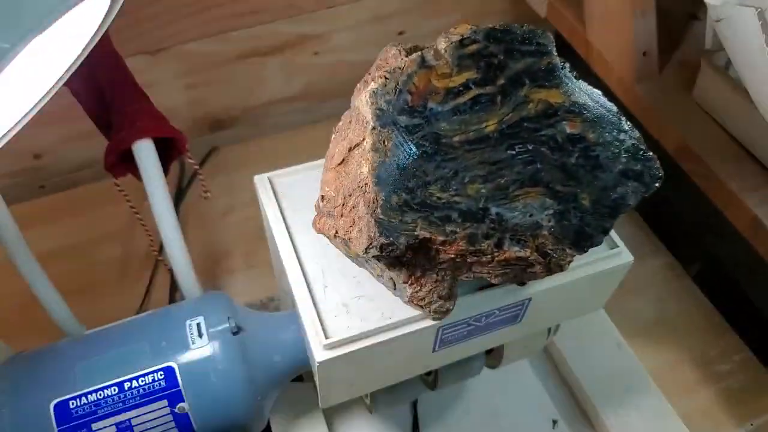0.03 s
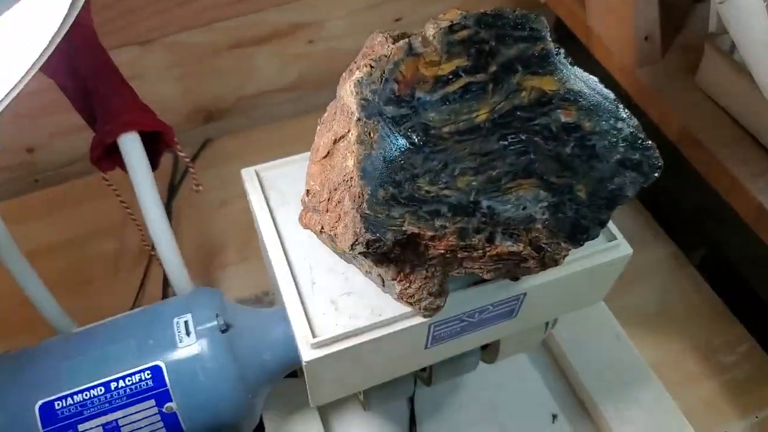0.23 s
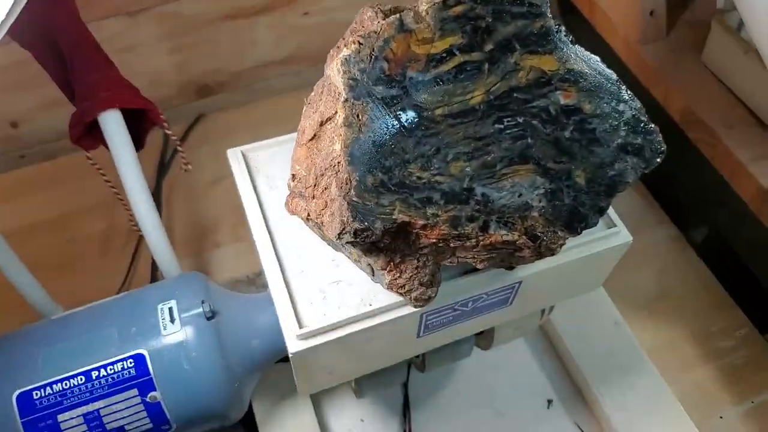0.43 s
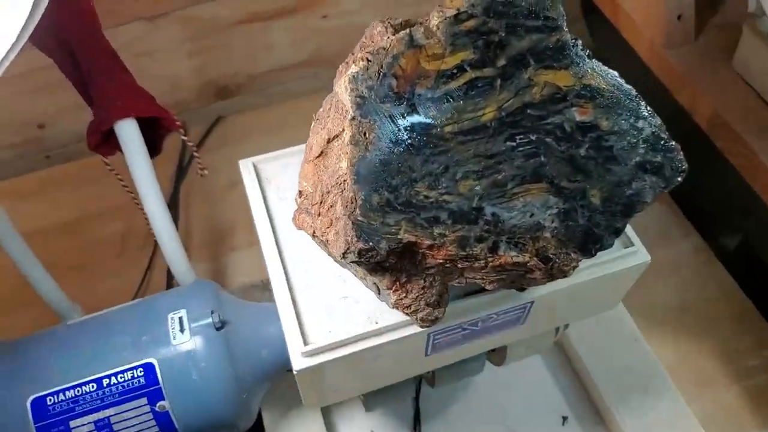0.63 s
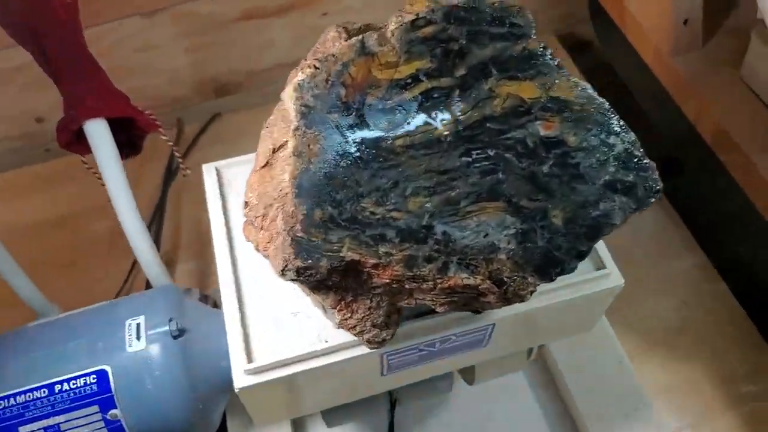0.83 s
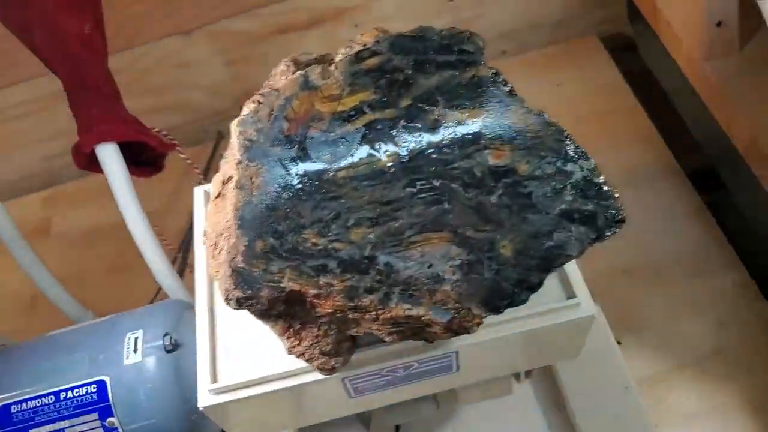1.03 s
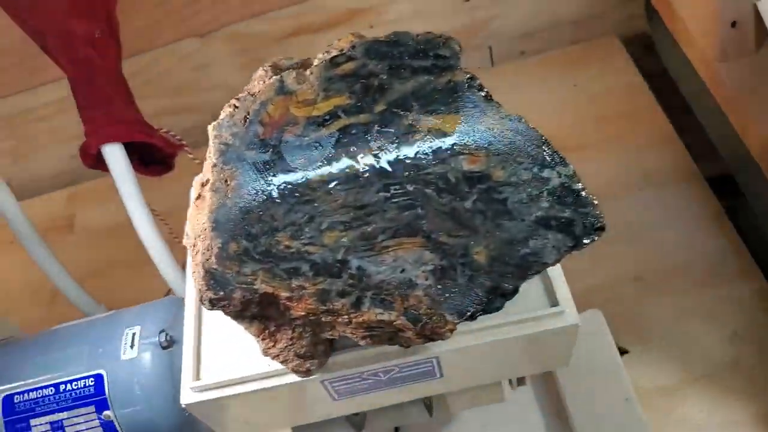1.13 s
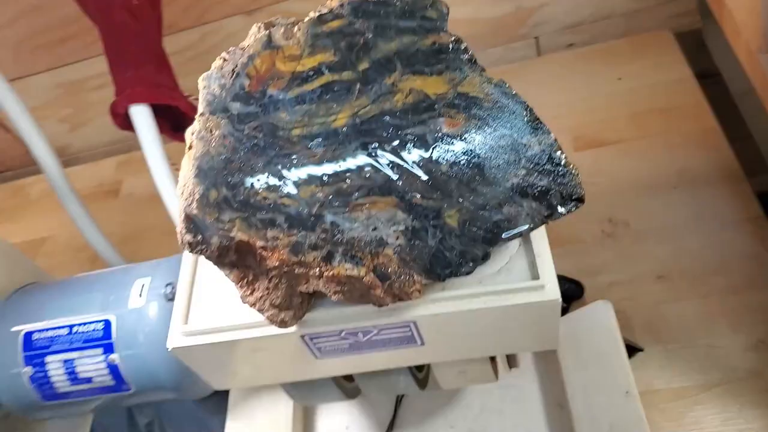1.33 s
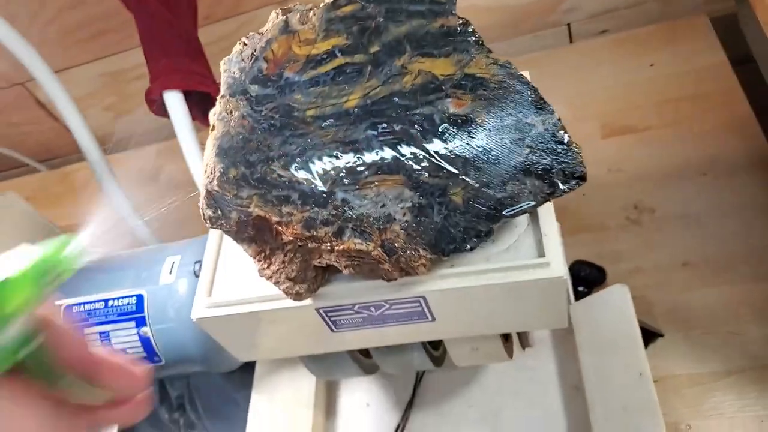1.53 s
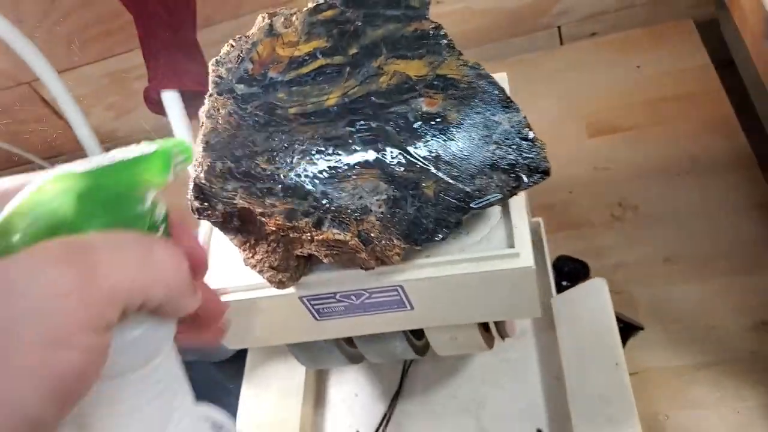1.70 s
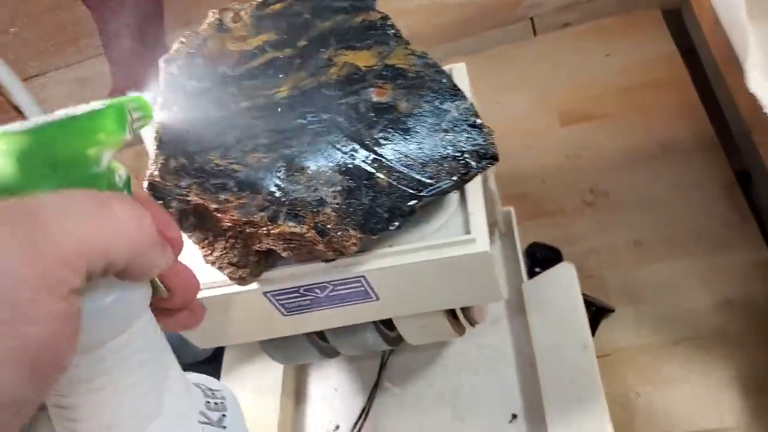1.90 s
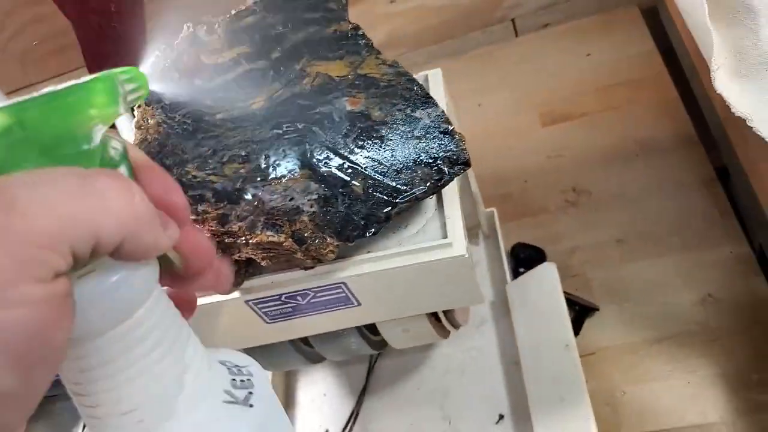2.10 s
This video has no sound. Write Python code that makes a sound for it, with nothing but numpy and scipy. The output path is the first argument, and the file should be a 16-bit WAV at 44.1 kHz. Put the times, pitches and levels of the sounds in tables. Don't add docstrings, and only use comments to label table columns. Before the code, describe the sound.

A hand-held spray bottle gives three brief hissing squirts with droplets pattering on stone, after quiet sleeve rubs, plastic ticks and soft bench thuds; small wooden workshop, close phone microphone, faint mains hum.

```python
import sys
import numpy as np
from scipy import signal
from scipy.fft import rfft, irfft
from scipy.io import wavfile
from scipy.ndimage import uniform_filter1d

SR = 44100
rng = np.random.default_rng(int(sys.argv[2]) if len(sys.argv) > 2 else 0)


def wav_out(sig):
    wavfile.write(sys.argv[1], SR, np.round(np.clip(np.atleast_2d(sig).T, -1, 1) * 32767).astype(np.int16))


def level_to_linear(level):
    exponent = np.asarray(level, float) / 20
    return 10 ** exponent


N = 94991
T = np.arange(N) / SR


def unit(x):
    return x / np.sqrt(np.mean(x ** 2))


def noise():
    return rng.standard_normal((3, N))


def colour(x, spectrum):
    hz, db = np.array(spectrum).T
    bin_hz = np.arange(N // 2 + 1) * SR / N + 1
    bin_db = np.interp(np.log(bin_hz), np.log(hz), db, left=-np.inf)
    return unit(irfft(rfft(x) * level_to_linear(bin_db), N))


def walk(rate_hz):
    k = int(SR / rate_hz)
    steps = np.repeat(rng.standard_normal(N // k + 1), k)
    return uniform_filter1d(uniform_filter1d(steps, k), k)[:N]


def since(start_s):
    return np.clip(T - start_s, 0, None)


def swell(start_s, rise_s, hold_s, fade_s):
    t = T - start_s
    return np.clip(t / rise_s, 0, 1) * np.exp(-np.clip(t - rise_s - hold_s, 0, None) / fade_s)


def rub(rubs, spectrum, rough_db):
    force = sum(level_to_linear(db) * swell(start, rise, hold, fade) for start, rise, hold, fade, db in rubs)
    return force * level_to_linear(rough_db * walk(45.76)) * colour(noise(), spectrum)


# (start [s], swell [s], hold [s], fade [s], level [dB])
CLOTH_RUBS = [
    (-.05, 0.14, 0.11, 0.029, -56),
    (.2, 0.027, 0.021, 0.014, -69),
]
# (frequency [Hz], level [dB])
CLOTH = [(120, -42), (200, 0.5), (1180, -1.5), (1530, -15.5), (2210, -4), (2910, -8), (3690, -4.5),
         (7410, -15), (16000, -10.5)]
# (start [s], swell [s], hold [s], fade [s], level [dB])
SLEEVE_RUBS = [
    (1.388, 0.0077, 0.27, 0.037, -53.5),
    (.97, 0.047, 0.39, 0.1, -69.5),
    (0.468, 0.018, 0.16, 0.078, -68),
]
# (frequency [Hz], level [dB])
SLEEVE = [(120, -24), (200, -11), (432, 2.5), (986, -4), (2050, -5), (3560, -5.5), (7830, -13),
          (14300, -6.5), (16000, -7)]


def sleeve_rubs():
    return rub(SLEEVE_RUBS, SLEEVE, rough_db=0.88) + rub(CLOTH_RUBS, CLOTH, rough_db=2.3)


# (frequency [Hz], width [Hz], level [dB])
HUM = [
    (57.1, 10.64, -61),
    (120.2, 11.7, -69.5),
    (567, 2.3, -77.5),
]
# (frequency [Hz], level [dB])
RUMBLE = [(25, -25), (38, -9), (52, 11.5), (75, 6.5), (130, -5), (300, -13.5), (700, -31)]
# (frequency [Hz], level [dB])
AIR = [(60, 0), (240, -29), (680, -20), (960, -25), (2500, -28), (3500, -38), (10000, -50), (16000, -51)]


def workshop():
    rumble_db, grows_db_per_s, air_db = -69.5, 7.5, -72
    hum = 0
    for hz, width_hz, db in HUM:
        level = level_to_linear(db + 2 * walk(width_hz))
        hum = hum + level * np.sin(2 * np.pi * hz * T + .5 * walk(width_hz))
    rumble = colour(noise(), RUMBLE) * level_to_linear(rumble_db + grows_db_per_s * T + 2 * walk(12.45))
    air = colour(noise(), AIR) * level_to_linear(air_db)
    return hum + rumble[0] + 0.56 * rumble[1:] + air[0] + .5 * air[1:]


# (start [s], hold [s], from [Hz], to [Hz], level [dB])
HOLLOWS = [(0.0, 0.038, 3020, 2950, -62), (0.0, 0.043, 1640, 1590, -65.5), (0.016, .04, 2200, 2200, -70),
           (0.059, 0.093, 2210, 2150, -62), (0.159, 0.036, 2300, 2260, -65),
           (0.212, 0.036, 2150, 2100, -68.5), (0.142, 0.0085, 1260, 1276, -54),
           (0.19, 0.075, 1253, 1250, -66), (0.346, 0.11, 2500, 2880, -73.5),
           (0.547, 0.014, 1740, 1680, -54), (.548, 0.011, 4200, 3980, -56), (0.589, 0.036, 1915, 1840, -68),
           (0.787, 0.0096, 6300, 6010, -53.5), (0.807, 0.061, 1500, 1500, -58),
           (1.257, 0.022, 2790, 2640, -55), (1.258, 0.026, 3700, 3580, -53.5),
           (1.298, 0.11, 2394, 2882, -57.5), (1.312, 0.146, 2197, 2158, -61),
           (1.784, 0.048, 1315, 1320, -46.5), (1.788, 0.064, 2300, 2250, -52),
           (1.882, 0.021, 1296, 1290, -34.5), (2.058, 0.017, 2100, 2130, -47),
           (2.135, 0.023, 1257, 1310, -42)]


def hollows():
    width_hz, rise_s, fade_s = 340, 0.00057, 0.0052
    real, imag = np.array([[walk(width_hz) for _ in range(3)] for _ in range(2)])
    tones = 0
    for start, hold, from_hz, to_hz, db in HOLLOWS:
        glide = np.sqrt(np.clip((T - start) / hold, 0, 1))
        phase = 2 * np.pi * np.cumsum(from_hz + (to_hz - from_hz) * glide) / SR
        tones = tones + level_to_linear(db) * swell(start, rise_s, hold, fade_s) * np.exp(1j * phase)
    return ((real + 1j * imag) * tones).real


# (time [s], level [dB], frequency [Hz], decay [s])
THUDS = [(0.147, -36, 79, 0.012), (1.21, -49, 58.7, 0.04), (1.281, -44, 302, 0.0039),
         (1.2988, -38.5, 245.5, 0.021), (1.3, -40.5, 108, 0.02), (1.301, -45, 506, 0.001),
         (1.325, -51, 630, 0.0029), (1.361, -49, 247, 0.026), (1.32, -51.5, 131.7, 0.054),
         (1.631, -54, 109, 0.045), (1.784, -46, 210, 0.0091), (1.833, -48, 147, 0.013),
         (1.885, -46, 91.5, .03), (1.887, -36, 160.5, 0.018), (2.063, -38, 183.5, 0.019),
         (2.131, -39.5, 157, 0.045)]
# (frequency [Hz], level [dB])
WOOD = [(100, -20), (250, 0), (800, -3), (1400, -8), (2500, -20), (5000, -40)]


def thuds():
    rattle_db, rise_s = -5.5, 0.004
    wood, out = colour(noise(), WOOD), 0
    for start, db, hz, decay in THUDS:
        t = since(start)
        knock = np.sin(2 * np.pi * hz * t) + level_to_linear(rattle_db) * (hz / 200) ** 2 * wood
        out = out + level_to_linear(db) * (1 - np.exp(-t / rise_s)) * np.exp(-t / decay) * knock
    return out


# (time [s], level [dB], ring [Hz], crack [dB], tail [dB])
TICKS = [(0.2077, -52, 3020, 3, -19), (.457, -48, 3430, 0.5, -23), (0.5468, -45.5, 1820, 8, -6.5),
         (0.637, -48, 2340, -2, -20), (0.758, -62, 1970, 2, -5), (.791, -48.5, 2560, 5.5, -5),
         (.977, -44, 2460, -2, -7), (1.005, -52, 2210, 0, -14), (1.1496, -28.5, 1620, 5, -14.5),
         (1.256, -45, 2920, 0, -24), (1.271, -38, 2740, -4, -25), (1.295, -37.5, 2220, -17, -19.5),
         (1.328, -44, 2660, -15, -18), (2.0675, -27.5, 2100, -4, -19.5)]
# (frequency [Hz], level [dB])
CRACK = [(500, -30), (1500, 0), (7000, -3), (16000, -14)]
# (frequency [Hz], level [dB])
TAIL = [(180, -4), (300, -17), (856, -3), (1230, 4.5), (1750, 4), (4590, -7.5), (6520, -7), (16000, -22)]


def ticks():
    rise_s, crack_s, ring_s, tail_s, gain_db = .0007, .0012, .002, 0.041, 1
    crack_noise, rustle_noise = colour(noise(), CRACK), colour(noise(), TAIL)
    out = 0
    for start, db, hz, crack_db, tail_db in TICKS:
        t = since(start)
        modes = np.sin(2 * np.pi * hz * t) + 1.14 * np.sin(2 * np.pi * 1.606 * hz * t)
        ring = np.exp(-t / ring_s) * modes * np.array([[1], [.3], [-.3]])
        crack = level_to_linear(crack_db) * np.exp(-t / crack_s) * crack_noise
        rustle = level_to_linear(tail_db) * np.exp(-t / tail_s) * rustle_noise
        onset = 1 - np.exp(-(t / rise_s) ** 2)
        out = out + level_to_linear(db + gain_db) * onset * (ring + crack + rustle)
    return out


# (time [s], level [dB],
# frequency [Hz])
CLICKS = [(.2085, -36, 3450), (.2087, -43, 5500), (0.547, -39, 6600), (.549, -35.5, 8580),
          (.5555, -42, 1810), (.7915, -50, 3900), (.796, -44, 2660), (0.802, -48, 1620),
          (1.2582, -34, 6430), (1.2582, -36, 4450), (1.259, -39.5, 10300), (1.268, -41, 6800),
          (1.283, -44, 2700), (1.283, -46, 7100), (1.2954, -33, 4200), (1.302, -45, 1500),
          (1.315, -51, 3940), (1.329, -38, 5930), (1.345, -49, 4350), (1.363, -48, 3800),
          (1.378, -47, 6460), (1.4648, -38, 3700), (1.4768, -41, 3500), (1.5965, -42, 5030),
          (1.598, -37, 7950), (1.832, -37, 800), (1.8587, -27.5, 9500), (1.8605, -27, 8900),
          (1.869, -19.5, 10000), (2.1157, -20, 13000), (2.1211, -21.5, 7800), (2.1208, -20.5, 11500),
          (2.144, -27, 12200)]


def clicks():
    decay_s = .0004
    out = 0
    for start, db, hz in CLICKS:
        t = np.clip(T - start, 0, 12 * decay_s)
        pulse = np.e * t / decay_s * np.exp(-t / decay_s)
        out = out + level_to_linear(db) * pulse * np.sin(2 * np.pi * hz * t)
    return out * np.array([[1], [.3], [-.3]])


# (time [s], length [s], from [Hz], to [Hz], level [dB])
SQUEAKS = [
    (0.246, 0.021, 16000, 11300, -66.5),
]


def squeaks():
    out = 0
    for start, length, from_hz, to_hz, db in SQUEAKS:
        u = np.clip((T - start) / length, 0, 1)
        phase = 2 * np.pi * np.cumsum(from_hz + (to_hz - from_hz) * u) / SR
        out = out + level_to_linear(db) * np.sin(np.pi * u) * np.sin(phase)
    return out


# (start [s], swell [s], hold [s], fade [s], level [dB])
GRIP_RUBS = [
    (.34, 0.077, 0.016, 0.029, -68.5),
    (.43, 0.044, 0.045, 0.027, -60),
    (.58, 0.015, 0.022, 0.016, -64.5),
    (.77, 0.033, 0.063, 0.056, -60),
    (1.0, 0.038, 0.2, 0.09, -60.5),
    (1.2, 0.085, 0.023, 0.0076, -59),
    (1.293, 0.0023, 0.1, 0.046, -59),
    (1.745, 0.01, 0.027, 0.01, -49),
    (1.785, 0.0084, 0.062, 0.0094, -47),
    (2.052, 0.0065, 0.014, 0.015, -38.5),
]
# (frequency [Hz], level [dB])
GRIP = [(350, -7.5), (790, 2), (950, 1.5), (1300, -2), (3640, -0.5), (8360, -14.5), (14500, -31)]


def grip_rubs():
    return rub(GRIP_RUBS, GRIP, rough_db=2.37)


# (start [s], swell [s], hold [s], fade [s], level [dB])
TRIGGER_RUBS = [
    (1.115, 0.021, 0.01, .004, -58.5),
    (1.792, 0.003, 0.0055, .012, -41.5),
    (1.836, 0.0065, 0.0023, 0.004, -37),
    (2.028, 0.0015, 0.0031, 0.0071, -41.5),
    (2.04, 0.00091, 0.0013, 0.011, -36.5),
    (2.066, 0.0016, 0.01, 0.011, -35),
    (2.089, 0.0028, 0.0025, .006, -57),
]
# (frequency [Hz], level [dB])
TRIGGER = [(180, -29), (300, -2), (994, 8), (2210, 1.5), (11900, -6), (13500, -6), (16000, -8.5)]


def trigger_rubs():
    return rub(TRIGGER_RUBS, TRIGGER, rough_db=1.5)


# (start [s], surge after [s])
SQUIRT_STARTS = [
    (1.601, .022),
    (1.858, .009),
    (2.112, .003),
]
# (length [s], nozzle level [dB], splash level [dB])
SQUIRTS = [
    (0.141, -32.5, -35),
    (0.138, -30.5, -32.5),
    (.15, -33.5, -29),
]
# (time [s], level [dB])
SPITS = [
    (1.6053, -29.5),
    (1.611, -33),
    (1.626, -56),
    (1.859, -30),
    (1.884, -31),
    (1.87, -32),
    (2.114, -31.5),
    (2.1205, -27.5),
    (2.132, -21.5),
]
# (frequency [Hz], level [dB])
NOZZLE = [(180, 7), (300, -5), (978, 12), (2250, 3.5), (6960, 7.5), (11300, 5), (14000, 10), (16000, 4)]
# (frequency [Hz], level [dB])
STONE = [(120, -54), (200, -16), (2610, -5.5), (3190, -0.5), (3830, -5.5), (4860, -7.5), (8580, -15.5),
         (13300, -17.5), (16000, -26)]


def spray():
    attack_s, release_s, spit_s = .004, 0.0051, 0.0013
    sag_db, sag_s, fall_db_per_s = -5, 0.056, 20
    sputter_db, sputter_s, presurge_db = 1.5, .025, -5
    peak_share, roundness, splash_rise_s, splash_release_s = 0.58, 1.82, 0.021, 0.096
    drops_per_s, drop_spread_db, drop_share_db = 3300, 4, 3
    jet, splash = 0, 0
    sputter = walk(110)
    for (start, surge), (length, jet_db, splash_db) in zip(SQUIRT_STARTS, SQUIRTS):
        t = since(start)
        db = jet_db + sag_db * (1 - np.exp(-np.abs(t - surge) / sag_s)) - fall_db_per_s * t
        db = db + sputter_db * sputter * np.exp(-t / sputter_s)
        db = db + presurge_db * np.clip((surge - t) / 0.0015, 0, 1)
        jet = jet + level_to_linear(db) * swell(start, attack_s, length, release_s)
        arch = np.exp(-roundness * (t / (peak_share * length) - 1) ** 2)
        splash_swell = swell(start, splash_rise_s, length, splash_release_s)
        splash = splash + level_to_linear(splash_db) * arch * splash_swell
    jet = jet + sum(level_to_linear(db) * swell(start, 0.00025, 0, spit_s) for start, db in SPITS)

    chance, sign, size = rng.random((3, 3, N))
    drop_level = level_to_linear(-drop_spread_db * np.log(size + 0.032))
    drops = (chance < drops_per_s / SR) * np.sign(sign - .5) * drop_level
    patter = noise() + level_to_linear(drop_share_db) * unit(drops)
    hiss = colour(patter[:, ::-1], NOZZLE)
    return jet * level_to_linear(1.7 * walk(70)) * hiss + splash * level_to_linear(0.5 * walk(75)) * colour(patter, STONE)


def heard(x, pan_db, scatter_db, room_db):
    lag_s, scatter_hz, alike_hz, t60_s = 0.0004253, 1500, 685, 0.12
    n = int(.25 * SR)
    high = signal.butter(2, scatter_hz, "high", fs=SR, output="sos")
    tail = rng.standard_normal((2, n)) * np.exp(-np.log(1000) * T[:n] / t60_s) * (T[:n] > .002)
    tail = signal.sosfilt(high, tail / np.sqrt(np.sum(tail ** 2, axis=1, keepdims=True)))
    low = signal.sosfiltfilt(signal.butter(2, alike_hz, fs=SR, output="sos"), x[0])
    late = low + np.interp(T - lag_s, T, x[0] - low)
    near = np.array([x[0], late]) + level_to_linear(scatter_db) * signal.sosfilt(high, x[1:])
    room = level_to_linear(room_db) * signal.fftconvolve(x[1:], tail, axes=1)[:, :N]
    return near * level_to_linear(np.array([[pan_db], [-pan_db]]) / 2) + room


def scene():
    sleeve = heard(sleeve_rubs() + squeaks(), pan_db=-5.5, scatter_db=4.7, room_db=-7.5)
    plastic = hollows() + ticks() + clicks() + grip_rubs()
    plastic = heard(plastic, pan_db=-4.5, scatter_db=1, room_db=-1.5)
    bench = heard(thuds(), pan_db=2.7, scatter_db=2, room_db=-4)
    bottle = heard(trigger_rubs() + spray(), pan_db=2.3, scatter_db=1, room_db=0.97)
    return sleeve + workshop() + plastic + bench + bottle


def roll_off(x):
    return signal.sosfilt(signal.butter(12, 16780, fs=SR, output="sos"), x)


def record(dry):
    top_hz, dip_hz, dip_share = 15900, (460, 1500), 0.29
    x = signal.sosfilt(signal.ellip(8, .2, 50, top_hz, fs=SR, output="sos"), dry)
    x = signal.sosfilt(signal.butter(2, 30, "high", fs=SR, output="sos"), x)
    shaded = signal.sosfilt(signal.butter(1, dip_hz, "band", fs=SR, output="sos"), x[0])
    mix = np.array([x[0] - dip_share * shaded, x[1]])
    return roll_off(mix)


dry = scene()
out = record(dry)
wav_out(out)
```